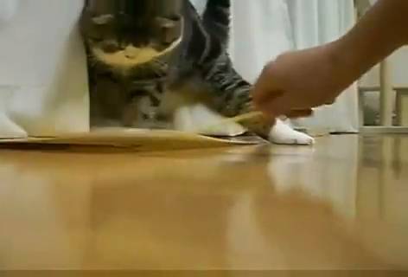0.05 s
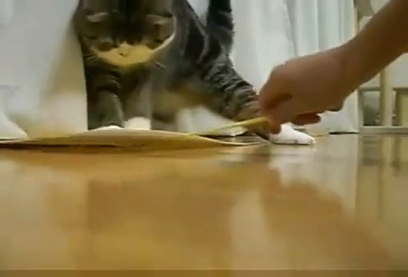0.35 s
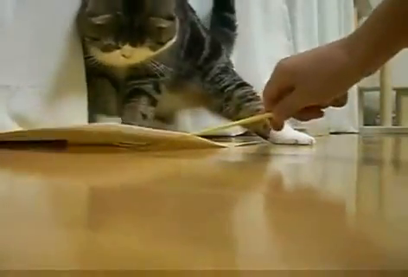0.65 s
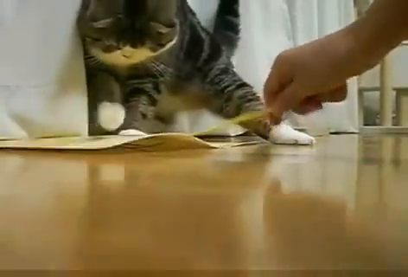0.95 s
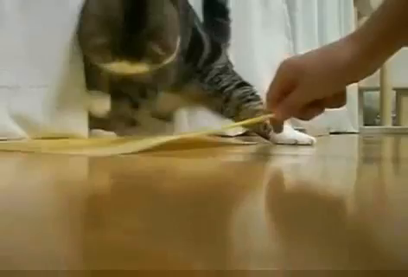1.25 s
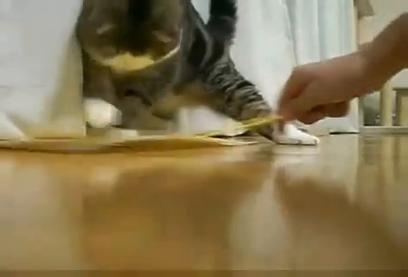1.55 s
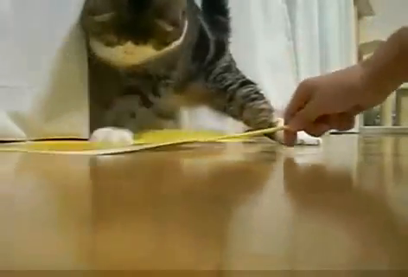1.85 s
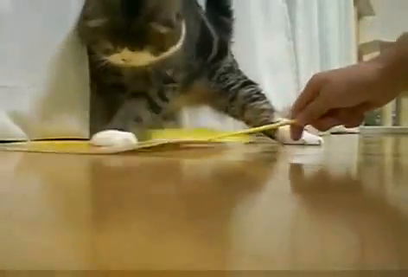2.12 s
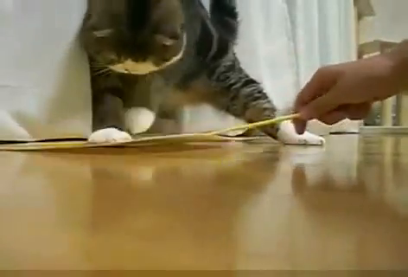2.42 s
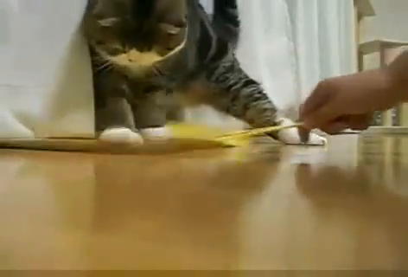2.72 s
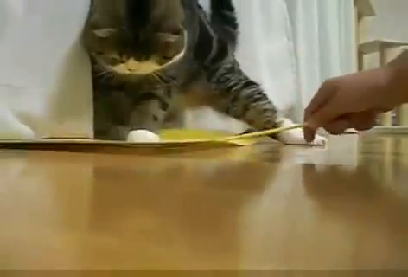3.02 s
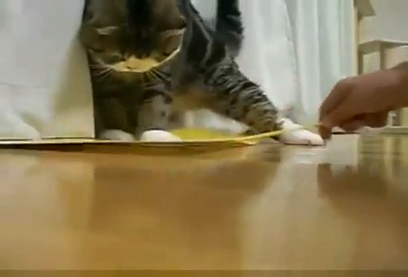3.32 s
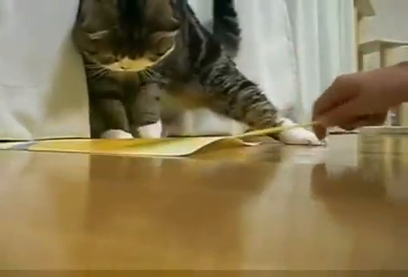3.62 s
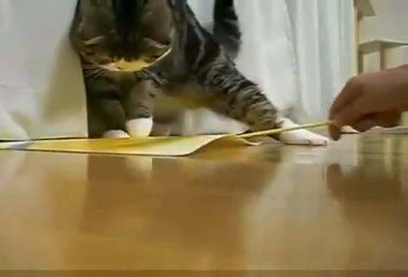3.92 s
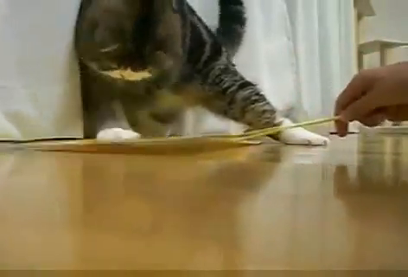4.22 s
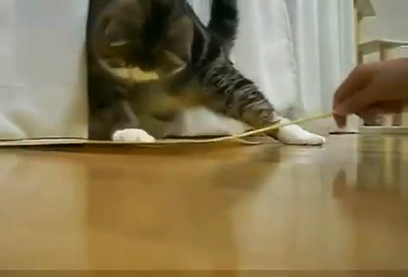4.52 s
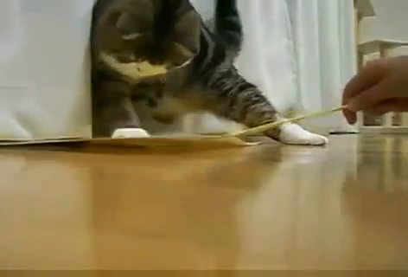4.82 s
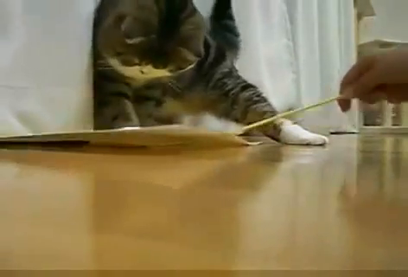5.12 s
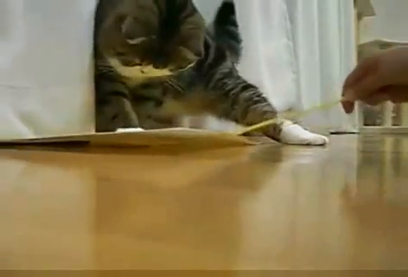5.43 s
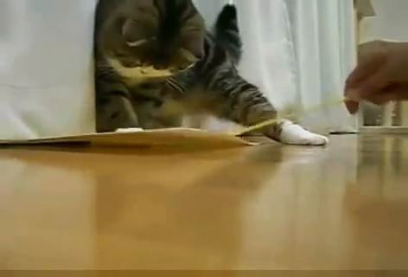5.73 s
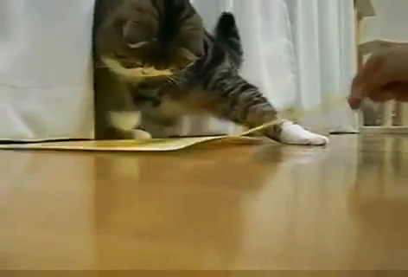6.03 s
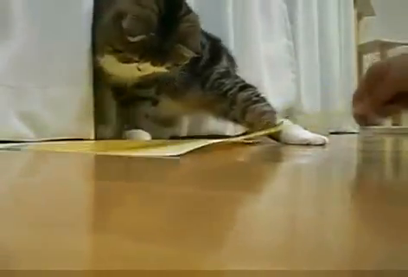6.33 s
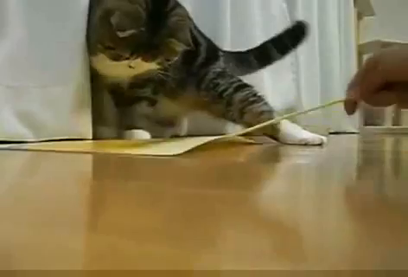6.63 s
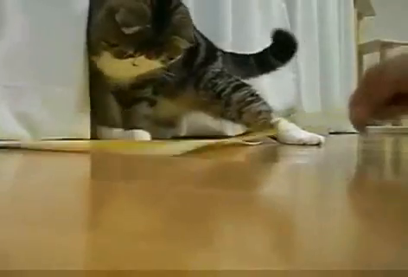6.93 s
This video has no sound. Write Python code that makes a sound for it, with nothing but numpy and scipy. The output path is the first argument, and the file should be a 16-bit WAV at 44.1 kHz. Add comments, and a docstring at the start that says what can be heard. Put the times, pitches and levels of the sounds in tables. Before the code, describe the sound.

Close by in a quiet room, paper is tugged hissing across floorboards, with flurries of crisp slaps from a cat's paws.

```python
"""In a small, quiet room, a stiff sheet of paper is tugged over a wooden floor while a cat pats and pins it.
Stick-slip friction makes the sliding sheet hiss, and it flutters against the boards.
Each blow flexes it with a knock, snaps its fibres and slaps it on the ringing floor; creases pop, paws thud.
The sound is heard from close by and low down, notched by the floor's reflection, over faint room noise."""
import sys
import numpy as np
from scipy import signal
from scipy.fft import irfft
from scipy.io import wavfile
from scipy.ndimage import uniform_filter1d

SR = 44100
rng = np.random.default_rng(int(sys.argv[2]) if len(sys.argv) > 2 else 0)


def output_pcm(signal):
    """Save a mono or channel-first signal as 16-bit PCM at the path in sys.argv[1].

    Samples are clipped to [-1, 1] before scaling.
    """
    pcm = np.clip(np.atleast_2d(signal).T, -1, 1) * 32767
    wavfile.write(sys.argv[1], SR, np.round(pcm).astype(np.int16))


N = 311334
TIME = np.arange(N) / SR

# blows on the sheet, each followed by its landing on the boards:
# t/s, knock level/dB, crackle level/dB, crackle tilt/(dB/octave), drop time/s, thump level/dB
PAW_BLOWS = [(0.022, -44, -31.5, 2.5, 0.0013, -45), (0.035, -43, -32, 1, 0.0031, -40),
             (0.088, -50, -33.5, -10, 0.005, -27.5), (0.356, -27.5, -32, -15, 0.011, -26),
             (0.388, -31, -26.5, -8, 0.0017, -31), (0.605, -55, -44, -2, 0, -30),
             (0.615, -50, -31.5, -6, 0.0026, -34), (1.211, -18, -19, -4.5, 0.011, -14),
             (1.225, -34, -14, -5, 0.0099, -13.5), (1.325, -49, -31, 5, 0.0033, -24),
             (1.376, -16, -22, -1.5, 0.013, -14.5), (1.411, -28, -19.5, -11, 0, -22),
             (1.426, -28, -20.5, 0, 0.022, -21.5), (1.452, -34, -44, -3, 0, -27.5),
             (1.494, -22.5, -20, -4, .01, -16.5), (1.504, -21.5, -17.5, -8.5, 0.01, -16),
             (1.628, -38, -24, 7, 0.0051, -23), (1.657, -24.5, -20, -3, 0.0023, -16),
             (1.755, -36, -27, 13, 0.00052, -21.5), (1.793, -37, -25, -4, 0.0015, -21),
             (1.81, -17.5, -22, -6, 0.0037, -14.5), (1.921, -37, -47, 6, 0.0015, -28),
             (1.958, -30.5, -25, -7, 0.0088, -17.5), (2.068, -49, -54, -1, 0, -25.5),
             (2.091, -25, -26.5, 0, 0.003, -19.5), (2.137, -29, -30, -4, 0.0036, -15.5),
             (2.305, -38, -32.5, -4, 0, -26), (2.325, -43, -33.5, 0, 0.0043, -22),
             (2.44, -27, -24.5, 0, 0.0091, -21.5), (2.498, -31, -37, 0, 0.0016, -20),
             (2.512, -23, -25, -9.5, .005, -16.5), (2.541, -33, -40, -4, 0.0024, -26),
             (2.701, -41, -35.5, -8.5, 0, -40), (2.75, -48, -29.5, -2.5, 0.002, -25.5),
             (2.775, -27.5, -35, -7, 0.0067, -32.5), (2.962, -22.5, -29, -6.5, 0.0026, -20),
             (3.106, -40, -55, 1, 0.0025, -28), (3.123, -53, -49, -7, 0, -33.5),
             (3.181, -54, -48, 6, 0, -21.5), (3.2, -56, -44, 3, 0.003, -32), (3.225, -46, -40, -6, 0, -37),
             (3.504, -35, -33.5, -9, 0.007, -43), (4.337, -18.5, -19.5, -10, 0.015, -23.5),
             (4.427, -17, -22, -8, 0.0087, -18.5), (4.442, -18, -19.5, -5.5, 0.0087, -16),
             (4.459, -36, -18.5, -15, 0.031, -34), (4.528, -16.5, -25, -2, 0, -19),
             (4.565, -22, -26, -3, .011, -28), (4.61, -35, -23, 1, 0.003, -21),
             (4.629, -23.5, -23, -3.5, 0, -30), (4.679, -14.5, -21.5, -9.5, 0.0085, -16),
             (4.691, -20.5, -21, -3, 0.007, -16), (4.772, -34, -39, -12, 0, -47),
             (4.854, -24, -27, -2, .018, -21.5), (5.005, -18.5, -26, -10, 0.012, -21),
             (6.339, -24.5, -27, -8, 0.011, -31), (6.668, -24.5, -28.5, -7, 0.017, -31),
             (6.734, -42, -49, -17, 0, -31), (6.984, -26, -19, -8.5, 0.0069, -26.5)]
# spectrum of fibres rubbing and snapping: f/Hz, level/dB
FIBRE_SPECTRUM = [(100, -38), (500, -3), (850, 1.5), (2000, -3), (4000, -1), (5600, 4), (7200, -0.5),
                  (9000, 0), (11000, -1), (13500, -3.5), (16000, -20)]


def blows(hardness=0.33, snap_backs=2, snap_back_s=0.04):
    """Impact excitation: the struck sheet knocks and crackles, lands, and its creases spring back."""
    out, landing = np.zeros(N), landing_spectrum()
    for s, knock_db, crackle_db, tilt, drop_s, thump_db in PAW_BLOWS:
        strike = amp(knock_db) * knock(pitch_hz=1118, focus_db=16) + amp(crackle_db) * crackle(tilt)
        add(out, s, strike)
        thump = burst(landing, rise=0.0014, t60=0.066, snap=0.62, spread_db=1.5)
        slap = amp(-5) * knock(pitch_hz=905, focus_db=10.5) + amp(-12) * crackle(tilt=-11.5)
        slap_db = thump_db + hardness * min(knock_db - thump_db, 0)  # a soft blow lands dully
        add(out, s + drop_s, amp(thump_db) * thump + amp(slap_db) * slap)
        for wait in rng.uniform(0.3, 1, snap_backs):
            snap = burst(snap_spectrum(tilt), rise=0.00018, t60=0.013, snap=0.92, spread_db=1.5)
            add(out, s + wait * snap_back_s, amp(crackle_db - 14) * snap)
    return out


def knock(pitch_hz, focus_db, width_hz=140):
    """Flexural resonance: a patch of stiff sheet rings, at a slightly different pitch each time."""
    # spectrum of the flexing sheet: f/Hz, level/dB
    flexing = [(100, -15), (500, -18.5), (800, -5.5), (1200, -10.5), (1700, -4.5), (2200, -24.5),
               (3000, -27), (6000, -29)]
    pitch_hz = pitch_hz * 2 ** rng.normal(0, 0.041)
    peak_db = 20 * np.log10(1 + amp(focus_db) / (1 + ((bins() - pitch_hz) / width_hz) ** 2))
    return burst(curve(flexing, bins()) + peak_db, rise=0.00015, t60=0.042, snap=0.83, spread_db=6)


def crackle(tilt):
    """Release of elastic strain: a cluster of fibres snaps."""
    return burst(snap_spectrum(tilt), rise=0.00055, t60=0.038, snap=0.23, spread_db=3)


def snap_spectrum(tilt):
    """Small sources radiate little bass: the spectrum of snapping fibres, in dB."""
    return curve(FIBRE_SPECTRUM, bins()) + tilt * octaves(bins()) - bass_loss(edge_hz=1900)


def landing_spectrum():
    """Modal response: the floorboards' resonances colour the slap of the sheet, in dB."""
    # spectrum of the sheet slapping on the boards: f/Hz, level/dB
    slap = [(30, -22), (90, -15), (150, -8), (200, -6.5), (265, -2.5), (325, -1.5), (385, 1), (470, -5),
            (600, -7), (800, -12), (1200, -15), (3000, -75.5)]
    # floorboard modes: f/Hz, width/Hz, gain/dB
    board_modes = [(208, 21, 4), (253, 22, 0), (326.6, 6.6, 8), (404.5, 75, 0.5), (457, 16, 5)]
    return curve(slap, bins()) + resonances(board_modes)


def slide(patchy_db=2, tug_flutter_db=-24, idle_flutter_db=-57):
    """Stick-slip friction: the sliding sheet hisses, while it flutters on the boards."""
    rubbing = colour(grains(N, spread_db=2.04, grain_s=0.00083), friction_spectrum(tilt=0, arch=0))
    rubbing += amp(-18.5) * colour(crinkles(), friction_spectrum(tilt=-1.2, arch=-1.2))
    hz, t, spectra = signal.stft(rubbing, SR, nperseg=512)
    level_db, tilt, arch = tugging(t)
    up = octaves(hz)[:, None]
    # the contact wanders over the sheet, so its colour shifts in patches
    patches = uniform_filter1d(rng.standard_normal(spectra.shape), size=7, axis=0)
    patches = unit(uniform_filter1d(patches, size=5, axis=1))
    gain = amp(level_db + tilt * up + arch * up ** 2 + patchy_db * patches)
    hiss = signal.istft(spectra * gain, SR, nperseg=512)[1][:N]
    flutter = unit(colour(grains(N, spread_db=2, grain_s=0.0055), landing_spectrum()))
    shaking = np.sqrt(flapping(t) ** 2 + amp(level_db + tug_flutter_db) ** 2 + amp(idle_flutter_db) ** 2)
    return hiss + np.interp(TIME, t, shaking) * flutter


def tugging(t, grip_s=0.015, swell_db=3, coast_db_per_s=256, dulling_db_per_octave_s=77):
    """Incoherent sources add in power: the tugs' total level in dB and power-weighted tilt and arch."""
    # tugs, most of them brightening as they gather speed:
    # t/s, length/s, level/dB, first tilt/(dB/octave), last tilt/(dB/octave), arch/(dB/octave^2)
    tugs = [(0.01, .13, -35, -6, -2.5, -1.5), (0.258, 0.12, -34.5, -2, 3, 0.9),
            (0.538, 0.055, -37.5, -7.5, -3, -1), (1.156, 0.077, -34, 0.5, 3, 1),
            (1.236, 0.1, -22.5, -13.5, 6, -3), (1.34, 0.23, -31, -2.5, -2, 0),
            (1.555, 0.091, -21, -11, 5, -3.5), (1.68, 0.17, -32.5, -3, -5, -2),
            (1.857, 0.14, -31.5, -3, -2.5, -0.5), (2.01, 0.18, -33, -1, -4, -1.5),
            (2.215, 0.14, -35, -7.5, 0, -3), (2.344, 0.23, -34, -0.5, -6.5, -1),
            (2.635, 0.25, -37.5, -2.5, -7, -2.5), (2.853, 0.15, -35, 1, -4.5, 1),
            (3.048, 0.21, -38.5, -7, -2, -4), (3.29, 0.075, -44.5, -4, -6, -1.5),
            (3.413, 0.24, -41.5, -5, -1.5, 0), (3.673, 0.29, -54.5, -9, -2, 2),
            (4.366, 0.22, -28, -2.5, -3.5, -0.5), (4.6, 0.14, -36.5, 8.5, -9.5, 2),
            (4.759, 0.076, -23, -2, 9.5, -4.5), (4.887, 0.18, -34, 1, -4, -1),
            (5.29, 0.12, -60.5, -14, -8, 5), (5.555, 0.064, -28.5, -12.5, -10.5, -3.5),
            (6.04, 0.099, -27.5, -13, 2.5, -3), (6.353, 0.11, -23, -5.5, 5, -3.5),
            (6.674, 0.12, -26.5, -8.5, 4.5, -3.5), (6.916, 0.028, -39.5, -10, 5.5, -1),
            (6.987, 0.13, -20, -7, 18, -5)]
    idle_db, idle_tilt = -58.5, -5.5  # the held sheet is never quite still
    powers, tilts, arches = [np.full(len(t), amp(idle_db) ** 2)], [np.full(len(t), idle_tilt)], [0 * t]
    for start, length, level_db, first_tilt, last_tilt, arch in tugs:
        # a tug takes hold, swells towards its middle, then coasts to rest and dulls
        age = np.maximum(t - start, 0)
        progress, coast_s = np.minimum(age / length, 1), np.maximum(age - length, 0)
        grip = 1 - np.exp(-age / grip_s)
        gain = grip * amp(level_db - swell_db * (2 * progress - 1) ** 2 - coast_db_per_s * coast_s)
        powers.append(gain ** 2)
        tilts.append(first_tilt + (last_tilt - first_tilt) * progress - dulling_db_per_octave_s * coast_s)
        arches.append(np.full(len(t), arch))
    total_db = 10 * np.log10(sum(powers))
    return total_db, np.average(tilts, axis=0, weights=powers), np.average(arches, axis=0, weights=powers)


def friction_spectrum(tilt, arch):
    """Source and filter: the noise of rubbing fibres shaped by the sheet's resonances, in dB."""
    # resonances and dips of the rubbed sheet: f/Hz, width/Hz, gain/dB
    sheet_modes = [(1280, 58, 3), (1370, 61, -7.5), (1770, 570, 2), (1880, 35, -11), (2490, 240, 0.5),
                   (4480, 110, 0.5), (5700, 590, -4)]
    up = octaves(bins())
    rubbed_db = curve(FIBRE_SPECTRUM, bins()) + resonances(sheet_modes)
    return np.maximum(rubbed_db + tilt * up + arch * up ** 2 - bass_loss(edge_hz=1080), -60)


def crinkles(per_s=110, spread_db=3):
    """A Poisson process: single fibres snap at random as the sheet bends."""
    size = amp(spread_db * np.minimum(rng.exponential(1, N), 3)) * rng.choice([-1, 1], N)
    return unit(size * (rng.random(N) < per_s / SR))


def flapping(t, below_thump_db=8, t60=0.22):
    """Damped vibration: the amplitude with which the sheet flaps on after each landing."""
    power = np.zeros(len(t))
    for s, *_, drop_s, thump_db in PAW_BLOWS:
        age = t - s - drop_s
        power += (age > 0) * amp(thump_db - below_thump_db - 60 * abs(age) / t60) ** 2
    return np.sqrt(power)


def scuffs(count=8000):
    """Transient friction: fast slips of the sheet's edge swell and fade under a Gaussian envelope."""
    # flicks of the edge: peak t/s, half length/s, level/dB, tilt/(dB/octave)
    flicks = [(0.129, 0.0085, -22.5, 6), (0.632, 0.013, -23, 4.5), (1.487, .0042, -36, 11),
              (1.514, 0.0045, -12, 4), (1.774, 0.015, -28.5, 5), (1.811, 0.0028, -13, 5),
              (2.143, 0.015, -22, -5.5), (2.462, 0.014, -29, 6), (2.521, 0.0091, -22, -2),
              (2.953, 0.0085, -33, -9), (3.205, 0.012, -26.5, 6.5), (3.547, 0.025, -42.5, 11.5),
              (4.396, 0.0065, -26, 5.5), (6.562, 0.0035, -33, 7), (6.742, 0.012, -21.5, 0),
              (7.049, 0.003, -19, 4)]
    out = np.zeros(N)
    t = (np.arange(count) - count / 2) / SR
    for s, half, level_db, tilt in flicks:
        hiss = colour(grains(count, spread_db=-1.5, grain_s=0.0011), friction_spectrum(tilt, arch=-2.5))
        flutter = amp(-12.5) * unit(colour(rng.standard_normal(count), landing_spectrum()))
        add(out, s + t[0], amp(level_db) * (hiss + flutter) * np.exp(-(t / half) ** 2 / 2))
    return out


def creases(width_hz=1500, height_db=10):
    """Buckling: single creases pop, each with a brief, broad resonance of its own."""
    # crease pops: t/s, level/dB, f/Hz
    pops = [(0.203, -41, 3530), (0.979, -46, 5300), (3.681, -35.5, 3750), (3.7474, -39, 6140),
            (3.897, -33.5, 7850), (3.972, -40.5, 5600), (4.0332, -42.5, 3320)]
    out = np.zeros(N)
    for s, level_db, pitch_hz in pops:
        ping = snap_spectrum(tilt=-6) + resonances([(pitch_hz, width_hz, height_db)])
        add(out, s, amp(level_db) * burst(ping, rise=0.001, t60=0.054, snap=0.25, spread_db=6.5))
    return out


def paws():
    """Cushioned impact: a padded paw excites mainly the floor's low frequencies."""
    # paws coming down hard: t/s, level/dB
    footfalls = [(4.443, -37), (4.693, -27), (4.871, -39), (5.016, -33)]
    # spectrum of the thud: f/Hz, level/dB
    thud = [(25, -12), (60, -8), (110, 1), (170, -13), (400, -35), (1500, -70)]
    out = np.zeros(N)
    for s, level_db in footfalls:
        add(out, s, amp(level_db) * burst(curve(thud, bins()), rise=0.003, t60=0.1, snap=0.5, spread_db=3))
    return out


def reverberation(x, first_s=0.0046):
    """Frequency-dependent absorption: sparse reflections die away at a different rate in each band."""
    # reverberation time of the room: f/Hz, t60/s
    decay_times = [(150, 0.16), (1000, 0.73), (4000, 0.44), (14000, 0.17)]
    count = SR // 2
    taps = rng.choice([-1., 1.], count) * (rng.random(count) < 0.08) * (TIME[:count] > first_s)
    hz, t, spectra = signal.stft(taps, SR, nperseg=256)
    decay = amp(-60 * t / curve(decay_times, hz)[:, None])
    tail = signal.istft(spectra * decay, SR, nperseg=256)[1]
    return signal.fftconvolve(x, tail / np.linalg.norm(tail))[:N]


def room_noise(dips_db):
    """Stationary noise: the still room, strongest in the bass and faintly notched."""
    # spectral density of the still room: f/Hz, relative level/dB
    ambience = [(25, -22), (60, -5), (100, -2.5), (200, -5.5), (400, -10), (800, -11), (1500, -22),
                (3000, -24.5), (6000, -27), (9000, -30.5), (13500, -28), (15800, -35.5)]
    return unit(colour(rng.standard_normal(N), curve(ambience, bins()) + 0.17 * dips_db))


def burst(spectrum, rise, t60, snap, spread_db, count=5000):
    """Impact noise: an impulse and a dying patter of contacts, filtered; rise and t60 are in seconds."""
    t = np.arange(count) / SR
    patter = grains(count, spread_db, grain_s=0.0005) * amp(-60 * t / t60) * (1 - np.exp(-t / rise))
    drive = unit(patter) + snap * unit(signal.unit_impulse(count)) * rng.choice([-1, 1])
    return unit(colour(drive, spectrum)) * np.sqrt(0.0035 * SR / count)  # energy of 3.5 ms at unit rms


def grains(count, spread_db, grain_s):
    """Amplitude modulation: noise whose strength changes from one tiny slip to the next."""
    t = np.arange(count) / SR
    strength = np.interp(t / grain_s, np.arange(count), rng.standard_normal(count))
    return unit(rng.standard_normal(count) * amp(spread_db * strength))


def colour(x, db, size=4096):
    """Minimum-phase filtering, with the given gain in each bin."""
    log_gain = np.log(amp(np.r_[db, db[-2:0:-1]]))
    response = irfft(np.exp(np.conj(signal.hilbert(log_gain)))[:len(db)])
    return signal.fftconvolve(x, response[:size // 2])[:len(x)]


def resonances(rows):
    """Bell-shaped peaks and dips, in dB at each bin."""
    return sum(db / (1 + ((bins() - hz) / width) ** 2) ** 2 for hz, width, db in rows)


def bass_loss(edge_hz):
    """Attenuation of a third-order high-pass, in dB at each bin."""
    return 10 * np.log10(1 + (edge_hz / (bins() + 20)) ** 6)


def curve(points, hz):
    """Interpolation on a log-frequency axis."""
    f, value = np.transpose(points)
    return np.interp(np.log(hz + 1), np.log(f), value)


def octaves(hz):
    """Octaves above the middle of the friction band, held constant below 1 kHz."""
    return np.log2(np.maximum(hz, 1000) / 4000)


def bins(size=4096):
    """Frequencies of a filter's bins."""
    return np.fft.rfftfreq(size, 1 / SR)


def amp(db):
    """Decibels to amplitude ratio."""
    return 10 ** (np.asarray(db) / 20)


def unit(x):
    """Normalisation to an rms of one."""
    return x / np.sqrt(np.mean(x ** 2) + 1e-20)


def add(mix, s, sound):
    """Superposition of a sound on the mix at time s."""
    part = mix[max(round(s * SR), 0):][:len(sound)]
    part += sound[:len(part)]


def scene():
    """Destructive interference: the floor bounce notches the near sheet's sound, over the quiet room."""
    # dips from the floor bounce and the microphone port: f/Hz, width/Hz, gain/dB
    notches = [(4750, 350, -11.5), (7900, 130, -16.5), (9410, 180, -12), (14080, 260, 0)]
    dips_db = resonances(notches)
    direct = blows() + paws() + creases() + scuffs() + slide()
    near = colour(direct + amp(-16) * reverberation(direct), dips_db)
    return (near + amp(-48.5) * room_noise(dips_db))[None]


def record(dry, edge_hz=15850):
    """Band limiting: a linear-phase low-pass removes the highest treble."""
    low_pass = signal.firwin(511, edge_hz, window=("kaiser", 9), fs=SR)
    return signal.oaconvolve(dry, low_pass[None], "same")


dry = scene()
out = record(dry)
output_pcm(out)
```